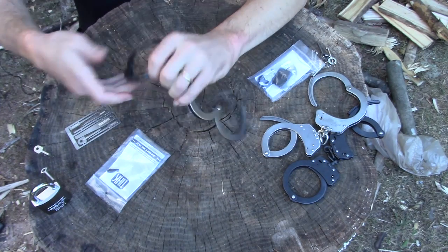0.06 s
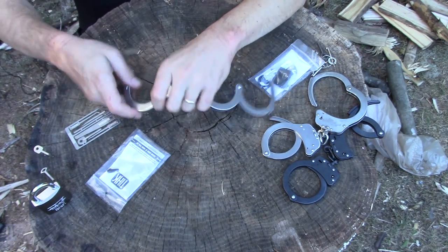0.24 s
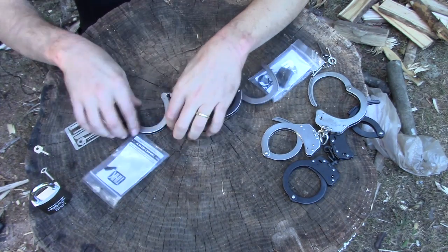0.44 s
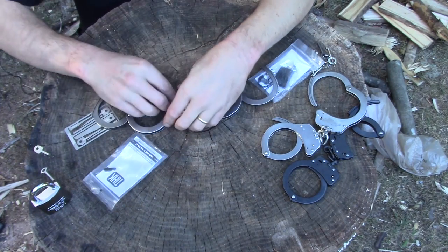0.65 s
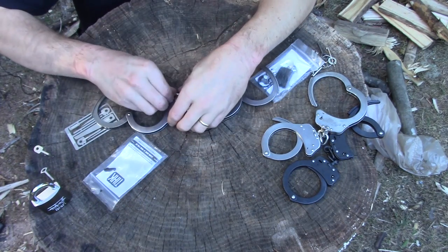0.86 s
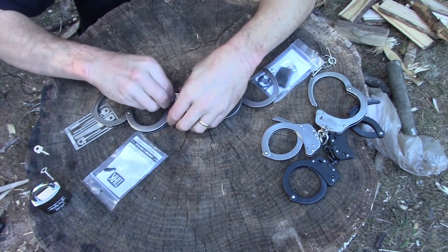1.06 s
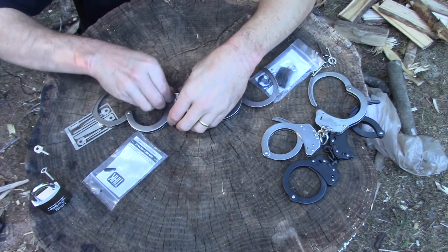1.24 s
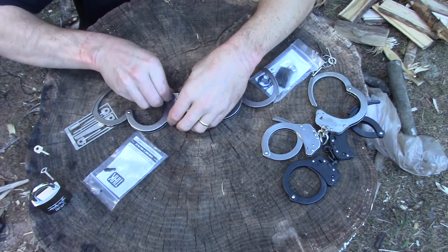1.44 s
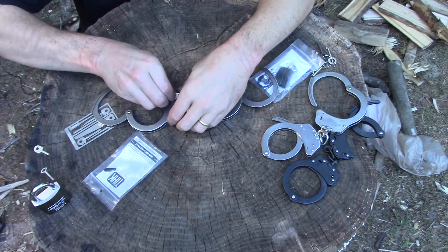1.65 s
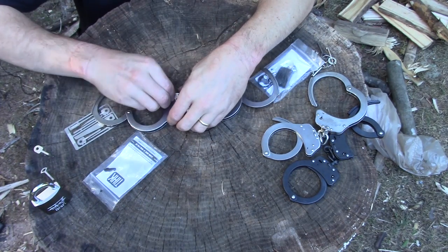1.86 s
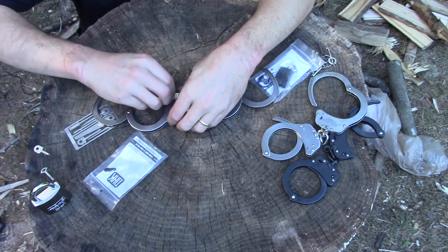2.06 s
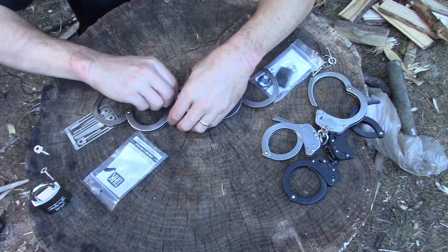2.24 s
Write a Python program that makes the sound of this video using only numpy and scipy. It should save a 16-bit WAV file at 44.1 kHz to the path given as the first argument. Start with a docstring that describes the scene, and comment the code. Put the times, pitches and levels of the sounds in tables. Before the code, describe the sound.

Handcuffs jingle, clatter onto wood, then tick faintly, with a bird calling far off.

```python
"""Handcuffs on a tree stump

Close to the microphone, steel handcuffs clink in the hands, drop on a stump with a dense rattle, then
tick faintly as they are held still. Steel on steel cracks and rings briefly; the wood knocks dead.
Far off among the trees a bird repeats one arched whistle. Air rumbles on the microphone over soft hiss."""
import sys
import numpy as np
from scipy import signal
from scipy.fft import rfft, irfft, next_fast_len
from scipy.io import wavfile
from scipy.ndimage import uniform_filter1d

SR = 44100
rng = np.random.default_rng(int(sys.argv[2]) if len(sys.argv) > 2 else 0)


def master(y):
    """Save y as 16-bit WAV."""
    cut = np.clip(np.atleast_2d(y).T, -1, 1)
    pcm = np.round(cut * 32767)  # scale
    wavfile.write(sys.argv[1], SR, pcm.astype(np.int16))


N = 105840
T = np.arange(N) / SR

# hiss of the open air: (frequency [Hz], level [dB])
AIR_COLOUR = [(60, 6), (150, -0.5), (300, 0.5), (600, -2), (1200, -5), (2200, -11.5), (4000, -13.5),
              (6300, -19.5), (7600, -15.5), (8800, -25), (12000, -32.5), (15500, -37)]
# wind on the microphone: (time [s], level [dB])
GUSTS = [(0.0, -24), (0.1, -37), (0.34, -25.5), (0.37, -31.5), (0.95, -30), (0.98, -36.5), (1.25, -31.5),
         (1.38, -41.5), (1.49, -34), (1.56, -45), (1.73, -36.5), (2.24, -39), (2.33, -33.5), (2.4, -44)]
# its rumble: (frequency [Hz], level [dB])
GUST_COLOUR = [(10, -28), (26, 3.5), (45, -2), (70, -10), (110, -16), (200, -25.5), (500, -60.5)]
# the distant bird calls: (time [s], level [dB])
CALLS = [(.172, -40.5), (.792, -43.5), (1.488, -44), (2.131, -45)]
# the arch of one whistle: (time into the call [s], pitch [Hz], level [dB])
WHISTLE_ARCH = [(0, 1230, -15), (.016, 1488, -2), (.034, 1596, -5.5), (.064, 1584, -1.5),
                (.085, 1395, -2.5), (.099, 1330, -4.5), (.122, 1290, -3), (.14, 1240, -14.5)]
# distinct echoes off the trees: (delay [s], level [dB])
TREE_REFLECTIONS = [(.060, -17), (0.109, -13.5)]
# a cuff slides over the wood: (time [s], length [s], level [dB])
CUFF_SLIDES = [(0.688, 0.021, -49), (0.814, 0.024, -43)]
# steel rubbing on wood: (frequency [Hz], level [dB])
RUB_COLOUR = [(300, -24.5), (1000, 6), (3500, -3), (6000, -7.5), (9500, -7.5), (13000, -65)]
# the cuffs tick, damped by the fingers: (time [s], level [dB], pitch [Hz])
HELD_TICKS = [(0.686, -41, 6520), (0.8258, -36, 6650), (0.8366, -33, 8150), (1.245, -40, 9500),
              (1.3873, -42.5, 3000), (1.614, -39, 5400), (1.6154, -42, 13100), (2.2080, -40, 3820),
              (2.2086, -32.5, 5460)]
# a damped contact: (frequency [Hz], level [dB])
DAMPED_COLOUR = [(2300, -11), (3600, 8), (10000, -2.5), (14000, -25)]
# steel knocks or rubs on the stump: (time [s], level [dB], decay [s], treble cutoff [Hz])
STUMP_KNOCKS = [(0.077, -34.5, 0.027, 1800), (.1140, -41, 0.01, 1100), (.2350, -31.5, .012, 1000),
                (.2460, -31, 0.01, 1200), (0.3880, -12, 0.0029, 2660), (0.407, -43, 0.013, 2500),
                (.4220, -18.5, 0.0082, 1900), (.4305, -10, .005, 4000), (.4450, -29.5, 0.018, 1500),
                (.4640, -26, 0.013, 3500), (.4870, -23.5, .006, 3000), (.5235, -29.5, 0.0045, 2660),
                (0.554, -38.5, 0.0062, 3100), (.5785, -35.5, 0.0025, 3570), (0.5974, -40.5, 0.003, 3600)]
# the struck stump: (frequency [Hz], level [dB])
STUMP_COLOUR = [(150, -12), (400, -13.5), (620, -1.5), (880, 3), (1040, -5.5), (1350, 3), (1750, -6.5),
                (2050, -2.5), (3050, -6.5), (3500, -6.5), (4000, -10.5), (12000, -50.5)]
# ringing of the cuffs: (frequency [Hz], level [dB], time to fall 60 dB [s])
CUFF_MODES = [(1950, -13.5, 0.022), (2847, -12, .075), (3385, -10, 0.099), (3555, -6, 0.029),
              (4430, -9, .11), (5300, -7, 0.075), (5990, -5, 0.08), (6540, 0, 0.0665), (6680, 0, 0.049),
              (7130, -3, 0.05004), (7700, -5, 0.054), (8060, -1, .08), (8930, -6, 0.03), (8700, -2, .07),
              (9220, -2, 0.079), (10510, 0, 0.045), (14950, -6.5, 0.03)]
# a steel contact: (frequency [Hz], level [dB])
CONTACT_COLOUR = [(300, -19), (1500, -18), (2700, -11.5), (3550, -9), (4900, -10), (5700, -19), (6100, 1),
                  (8800, -11.5), (10600, -2), (12200, -10.5), (13300, -7.5), (14700, -3), (15700, -26)]
# the chain tumbles as the cuffs land: (time [s], level [dB])
CHAIN_TUMBLE = [(.386, -68.5), (0.393, -16), (.418, -23), (0.44, -19.5), (0.472, -25), (.503, -51),
                (.535, -66)]
# steel touches steel: (time [s], level [dB], favoured pitch [Hz], its prominence [dB])
CUFF_CLINKS = [(0.075, -22, 10100, 8), (0.0758, -29, 4000, 32), (.0830, -28, 8530, -9),
               (0.0919, -26, 7100, -5), (.1612, -32, 1990, 24), (0.1615, -16.5, 10700, 6),
               (0.1626, -15.5, 7200, 12), (.1766, -26, 7200, -4), (0.186, -34, 9000, 12),
               (0.2218, -13.5, 6300, 3.5), (0.2293, -20, 6400, 5), (0.235, -30, 7600, 9.5),
               (0.2472, -26, 7980, 8), (0.2638, -17, 8240, 7), (0.263, -29.5, 2900, 35),
               (0.271, -31.5, 7773, 8), (0.2747, -27.5, 8120, 10.5), (0.278, -25, 7550, -4.5),
               (0.283, -32, 8000, 3), (0.2916, -35, 6400, 21.5), (0.369, -23, 6900, 11),
               (0.371, -7, 6980, 21.5), (0.3889, -5, 8440, 9), (0.3905, -5.5, 8380, 10),
               (0.392, -7, 7240, 0), (0.3999, -9.5, 7800, 11.5), (0.4098, -19.5, 9000, 6),
               (0.41, -8, 8520, 18.5), (0.4146, -29.5, 8740, 5.5), (.4212, -15, 6600, 3.5),
               (0.4285, -3.5, 6500, 9.5), (0.4324, -5.5, 9080, 12), (0.4373, -7, 6900, 20),
               (0.4408, -5.5, 10000, 16), (0.443, -9.5, 8880, 9), (0.4488, -4, 8500, 16),
               (0.458, -13, 8500, 11), (0.4614, -9, 6600, 14), (0.4643, -14.5, 6510, 14),
               (0.4674, -28, 6920, 2.5), (0.4727, -15.5, 7500, 18.5), (0.4795, -9, 8500, 16),
               (0.488, -20, 7130, 18), (0.4943, -23, 7040, 14), (0.5069, -29, 8000, 16),
               (0.5114, -26, 7600, 4), (.5216, -35, 7100, 12)]
# light touches lose treble: (level [dB], treble cutoff [Hz])
CUTOFF_BY_LEVEL = [(-44, 9200), (-19.5, 8800), (-5, 14700)]
# reflections from around the stump: (frequency [Hz], level [dB])
NEAR_ECHO_COLOUR = [(1800, 7.0), (7000, -5.0), (14000, -29)]


def from_db(db):
    """Decibels to gain."""
    return 10 ** (np.asarray(db) / 20)


def rms_one(x):
    """Scale to unit rms."""
    return x / np.sqrt(np.mean(x ** 2) + 1e-20)


def peak_one(x, size=44):
    """Scale so that the loudest millisecond has unit rms."""
    return x / np.sqrt(uniform_filter1d(x * x, size).max() + 1e-20)


def add(out, start_s, x):
    """Mix x into out from start_s on."""
    i = max(int(start_s * SR), 0)
    out[i:i + len(x)] += x[:N - i]


def dull(x, hz):
    """Roll off everything above hz."""
    return signal.sosfilt(signal.butter(2, min(hz, SR / 2 - 1), fs=SR, output="sos"), x)


def colour(x, points, focus_hz=1000, focus_db=0, width_oct=1):
    """Causal filter through (frequency [Hz], level [dB]) points, with an optional bump at focus_hz."""
    n = 2 * next_fast_len(len(x))
    octave = np.log2(np.maximum(np.arange(n // 2 + 1) * SR / n, 1))
    hz, db = np.transpose(points)
    bump_db = focus_db * np.exp(-.5 * ((octave - np.log2(focus_hz)) / width_oct) ** 2)
    curve_db = np.interp(octave, np.log2(hz), db) + bump_db
    # minimum phase, so nothing sounds ahead of a hit
    cepstrum = irfft(np.log(from_db(curve_db)))
    cepstrum[1:n // 2] *= 2
    cepstrum[n // 2 + 1:] = 0
    return irfft(rfft(x, n) * np.exp(rfft(cepstrum)))[:len(x)]


def burst(envelope):
    """A run of tiny impacts of random sign under an envelope."""
    return envelope * rng.choice([-1, 1], len(envelope))


def echoes(x, t60_s, count=160):
    """Scattered reflections from trunks and ground, of unit energy."""
    delay = .012 + .6 * t60_s * rng.random(count)
    response = np.zeros(N)
    response[(delay * SR).astype(int)] = rng.choice([-1, 1], count) * from_db(-60 * delay / t60_s)
    return signal.fftconvolve(x, response / np.linalg.norm(response))[:N]


def air_hiss(level_db=-44.5):
    """The soft, steady hiss of open air all around."""
    return from_db(level_db) * rms_one(colour(rng.standard_normal(N), AIR_COLOUR))


def faint_trill(centre_hz=7200, swing_hz=252.7, swings_per_s=8.4, flutter_hz=170, level_db=-64.5):
    """A thin, high band of noise wavers in pitch, far in the background."""
    flutter = dull(rng.standard_normal(N), flutter_hz)
    pitch = centre_hz + swing_hz * np.sin(2 * np.pi * swings_per_s * T)
    return from_db(level_db) * rms_one(flutter * np.sin(2 * np.pi * np.cumsum(pitch) / SR))


def microphone_wind():
    """Gusts on the microphone make a low, uneven rumble."""
    strength = from_db(np.interp(T, *np.transpose(GUSTS)))
    return strength * rms_one(colour(rng.standard_normal(N), GUST_COLOUR))


def distant_bird(break_s=0.12, rasp_hz=110, rasp_depth=1.5, woods_db=-5.5):
    """Far off, a pure whistle rises, holds, falls into a rasp, and comes back from the trees."""
    times, hz, db = np.transpose(WHISTLE_ARCH)
    t, out = T[T < times[-1]], np.zeros(N)
    phase = 2 * np.pi * np.cumsum(np.interp(t, times, hz)) / SR
    whistle = np.sqrt(2) * from_db(np.interp(t, times, db)) * np.sin(phase)
    roughness = rasp_depth * dull(1. * (t > break_s), rasp_hz)
    for start, level_db in CALLS:
        rasp = rms_one(dull(rng.standard_normal(len(t)), rasp_hz))
        call = from_db(level_db) * whistle * (1 + roughness * rasp) / np.sqrt(1 + roughness ** 2)
        add(out, start, call)
        for delay, echo_db in TREE_REFLECTIONS:
            add(out, start + delay, from_db(echo_db) * call)
    return out + from_db(woods_db) * echoes(out, t60_s=0.75)


def cuff_slides():
    """A cuff slides over the wood in short, gritty rubs that swell and stop."""
    out = np.zeros(N)
    for start, length_s, db in CUFF_SLIDES:
        size = int(length_s * SR)
        grit = np.sqrt(np.hanning(size)) * rng.laplace(size=size)
        add(out, start, from_db(db) * rms_one(colour(grit, RUB_COLOUR)))
    return out


def held_ticks(size=2000, grit_db=-5, decay_s=0.0012):
    """Contacts damped by the fingers: a snap and a little grit through a broad resonance."""
    out = np.zeros(N)
    for start, db, hz in HELD_TICKS:
        grit = from_db(grit_db) * burst(np.exp(-T[:size] / decay_s))
        tick = colour(signal.unit_impulse(size) + grit, DAMPED_COLOUR, hz, focus_db=14, width_oct=0.15)
        add(out, start, from_db(db) * peak_one(tick))
    return out


def stump_knocks(size=6000):
    """Steel meets end grain in short, dead, gritty knocks."""
    out = np.zeros(N)
    for start, db, decay_s, cutoff_hz in STUMP_KNOCKS:
        knock = colour(burst(np.exp(-T[:size] / decay_s)), STUMP_COLOUR)
        add(out, start, from_db(db) * peak_one(dull(knock, cutoff_hz)))
    return out


def steel_ring(t, bloom=0, bloom_t60_s=0.014, base_db=-33, spread_db=2.5):
    """The modes of the cuffs, each struck with its own strength; bloom briefly swells the onset."""
    hz, db, t60 = np.transpose(CUFF_MODES)[:, :, None]
    struck_db = base_db + db + spread_db * rng.standard_normal(hz.shape)
    envelopes = from_db(struck_db - 60 * t / t60)
    modes = envelopes * rng.choice([-1, 1], hz.shape) * np.sin(2 * np.pi * hz * t)
    return modes.sum(0) * (1 + bloom * from_db(-60 * t / bloom_t60_s))


def chain_rattle(size=6000, links=6, hits_per_s=1300, ring_db=1.5):
    """Links tumble over each other in many small hits; each link rings the steel in its own way."""
    times, db = np.transpose(CHAIN_TUMBLE)
    vigour = from_db(np.interp(T, times, db)) * (T > times[0]) * (T < times[-1])
    out = np.zeros(N)
    for _ in range(links):
        struck = rng.random(N) < hits_per_s / links / SR
        hits = vigour * rms_one(struck * rng.standard_normal(N))
        ring = steel_ring(T[:size])
        crack = colour(signal.unit_impulse(size), CONTACT_COLOUR)
        link = crack + from_db(ring_db) * ring / np.linalg.norm(ring)
        out += signal.oaconvolve(hits, link)[:N]
    return out / np.sqrt(links)


def cuff_clinks(size=6000, crack_decay_s=0.00066, chatter_db=-14, chatter_decay_s=0.0067, bloom_db=27.5):
    """Steel on steel, close up: a hard crack, brief chatter and a short ring; light touches are duller."""
    t, out = T[:size], np.zeros(N)
    envelope = np.exp(-t / crack_decay_s) + from_db(chatter_db) * np.exp(-t / chatter_decay_s)
    for start, db, hz, prominence_db in CUFF_CLINKS:
        crack = peak_one(colour(burst(envelope), CONTACT_COLOUR))
        ring = steel_ring(t, bloom=from_db(bloom_db))
        clink = colour(crack + ring, [(hz, 0)], hz, prominence_db, width_oct=0.1744)
        cutoff_hz = np.interp(db, *np.transpose(CUTOFF_BY_LEVEL))
        add(out, start, from_db(db) * peak_one(dull(clink, cutoff_hz)))
    return out


def scene(near_echo_db=-18.5):
    """One microphone by the stump: cuffs close up, the bird and the open air behind."""
    cuffs = cuff_clinks() + chain_rattle() + held_ticks() + stump_knocks() + cuff_slides()
    reflected = from_db(near_echo_db) * colour(echoes(cuffs, t60_s=.22), NEAR_ECHO_COLOUR)
    background = distant_bird() + air_hiss() + microphone_wind() + faint_trill()
    return (cuffs + reflected + background)[None]


def record(dry, ceiling=1.15, cutoff_hz=15850):
    """The recorder rounds the loudest peaks and cuts the highest treble."""
    rounded = ceiling * np.tanh(dry / ceiling)
    return signal.sosfilt(signal.ellip(10, .1, 80, cutoff_hz, fs=SR, output="sos"), rounded)


dry = scene()
out = record(dry)
master(out)
```